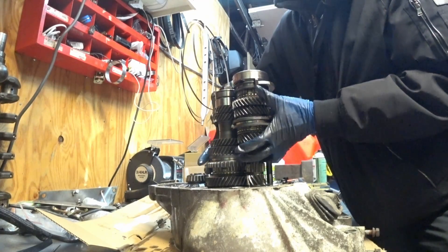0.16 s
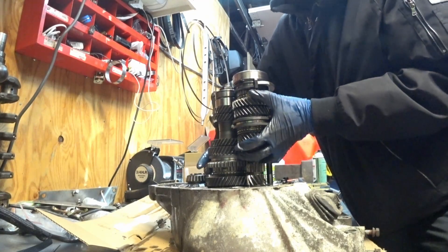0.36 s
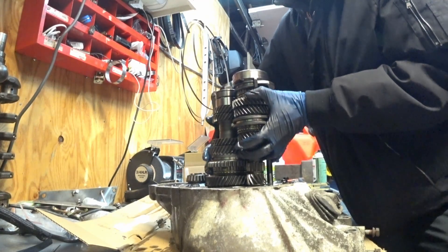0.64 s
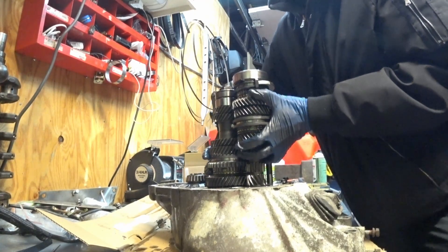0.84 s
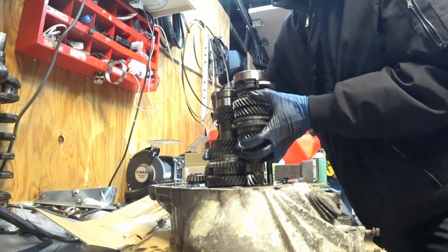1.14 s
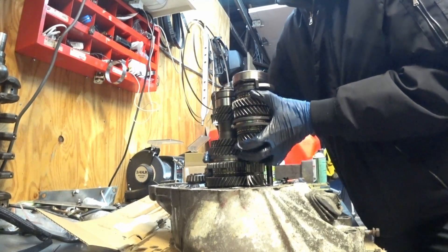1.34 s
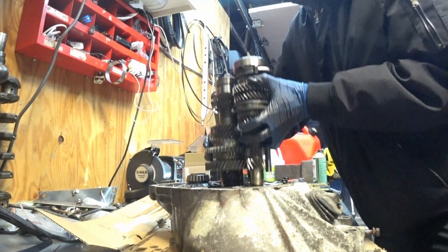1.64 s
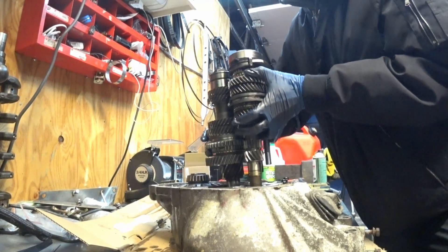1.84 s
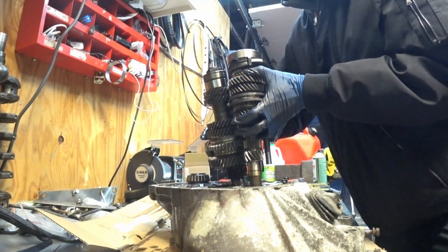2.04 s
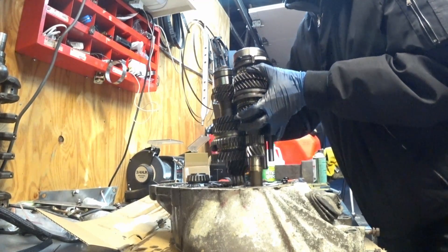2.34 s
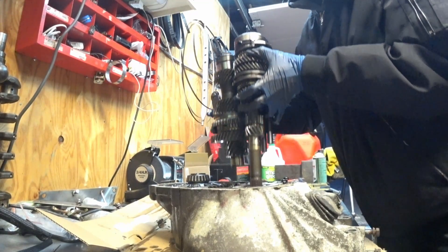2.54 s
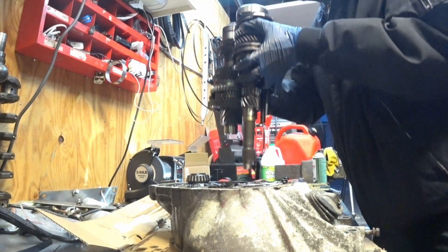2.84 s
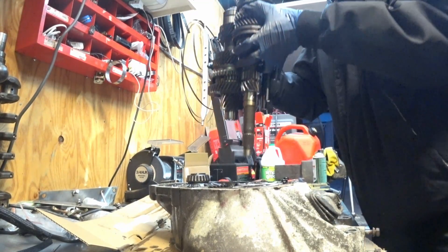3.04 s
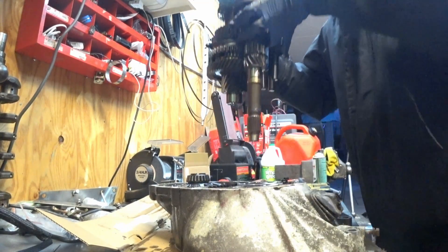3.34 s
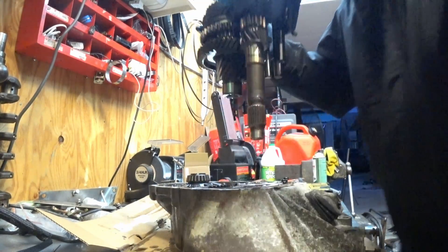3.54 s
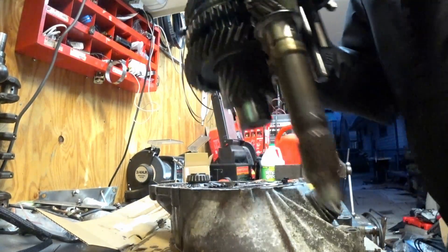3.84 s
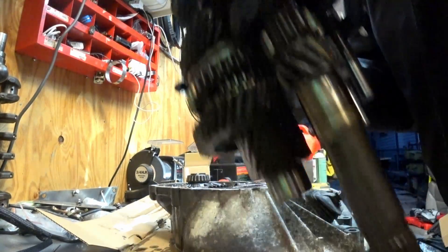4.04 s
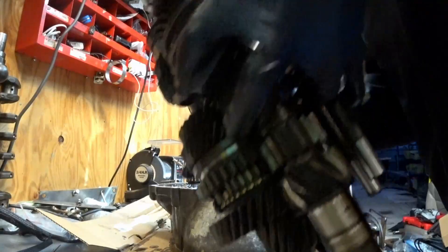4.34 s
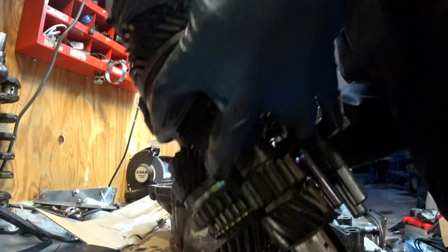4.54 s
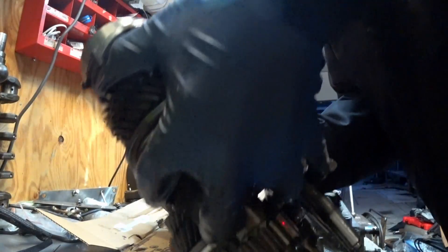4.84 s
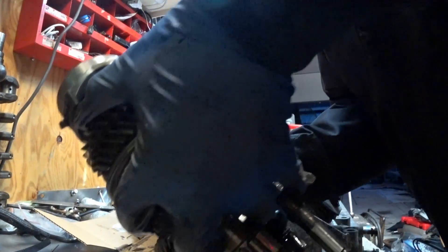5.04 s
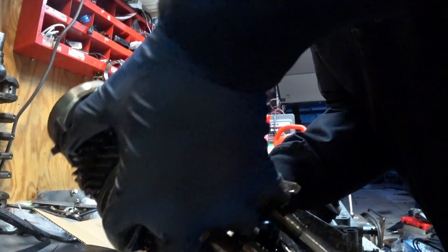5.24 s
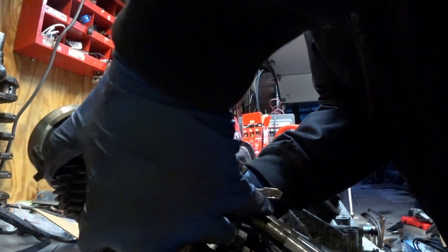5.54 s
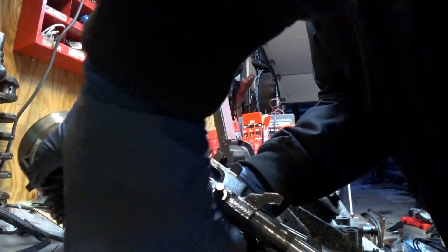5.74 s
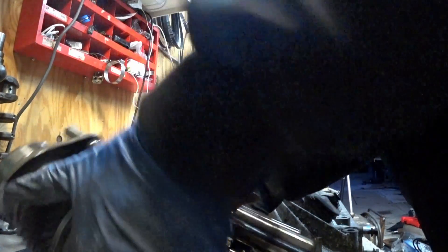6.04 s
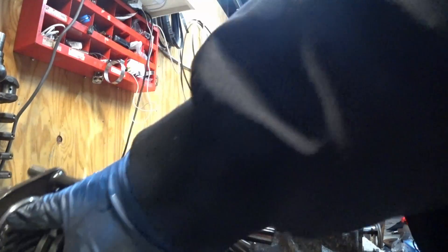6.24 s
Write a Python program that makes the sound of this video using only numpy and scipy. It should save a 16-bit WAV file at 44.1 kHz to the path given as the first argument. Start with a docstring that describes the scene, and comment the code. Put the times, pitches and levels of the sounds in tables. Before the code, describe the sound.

A microphone resting on a garage bench picks up booming low rumble and loud, sometimes squashed metal impacts as gears are pulled from a case. After nearly three seconds the knocking stops, leaving soft cloth rustle and scrape. A click and short ringing grate follow, then a thump, rapid damped clacks and scattered ticks as the parts are laid down.

```python
"""Steel gear shafts are worked loose in a gearbox case: teeth clink (modal bursts), blows and pushes
shake the bench that carries the microphone (low resonances). Groans and brief ringing notes sound
(gliding tones) as they are lifted out; a nylon jacket swishes and metal scrapes throughout (shaped noise).
A loose shaft grates and sings at 4.5 s (noise through narrow modes); from 4.9 s the steel is laid on the
wooden bench. A limiter ducks the whole sound at the loudest shocks."""
import sys
import numpy as np
from scipy import signal
from scipy.io import wavfile
from scipy.ndimage import uniform_filter1d

SR = 44100
rng = np.random.default_rng(int(sys.argv[2]) if len(sys.argv) > 2 else 0)


def to_wav(s):
    """Save 16-bit WAV."""
    ch = np.atleast_2d(s).T  # columns
    pcm = np.round(np.clip(ch, -1, 1) * 32767)  # PCM
    wavfile.write(sys.argv[1], SR, pcm.astype(np.int16))


N = 281358

# All levels are relative within their source.
# Teeth and shafts striking: t/s, level/dB, ring centre f/Hz
CLINKS = [(0.088, 1, 2780), (0.133, 4, 4040), (0.132, 0, 9050), (0.15, 7.5, 3600), (0.15, -3, 7800),
          (0.579, -15.5, 2240), (0.619, -12, 4800), (0.669, -12.5, 980), (0.745, -14, 1000),
          (0.893, 11.5, 810), (1.054, -18.5, 2320), (1.413, -21, 4670), (1.47, -14.5, 3150),
          (1.475, -16, 2900), (1.488, 6.5, 4570), (1.495, -1, 2430), (1.546, -15, 1070), (1.599, -22, 3900),
          (1.679, -22, 3570), (1.698, -10.5, 900), (1.762, -11.5, 3280), (1.817, -9, 3120),
          (2.01, -12, 1300), (2.122, -12, 1020), (2.362, -14.5, 3220), (2.459, -17, 1250),
          (2.508, -15, 3400), (2.681, -1, 1320), (2.681, 0, 3420), (2.784, -14, 1400), (2.797, -5.5, 2370),
          (2.849, -19.5, 1320), (4.346, -18, 4240), (4.349, -3.5, 4180), (4.375, -27, 4800),
          (4.389, -22, 2900), (4.565, -13, 834), (4.961, -10.5, 1020), (5.008, -9, 1006),
          (5.051, -8.5, 1150), (5.077, -6.5, 1090), (5.125, -5, 1200), (5.136, 1, 1210), (5.176, 3.5, 1370),
          (5.182, 6, 1230), (5.239, -6.5, 3400), (5.319, -6, 3800), (5.332, 5.5, 1530), (5.42, -0.5, 3840),
          (5.425, -9, 3160), (5.401, -8.5, 4470), (5.438, -0.5, 4430), (5.444, -4, 2250),
          (5.483, -6.5, 4550), (5.5, -8, 5070), (5.756, -0.5, 3060), (5.976, 0, 3370), (6.047, -10, 2710),
          (6.066, 1, 2030), (6.087, -12, 4700), (6.096, -2, 1170), (6.108, -6, 1270), (6.162, -6, 1730),
          (6.306, -7, 3550)]
# Modes of the gear cluster: f/Hz
STEEL_MODES_HZ = [870, 1060, 1250, 1480, 1660, 2050, 2400, 2800, 3150, 3550, 3850, 4400, 4840, 5200, 5900,
                  7000, 7800, 8800]
# Heavy blows that reach the bench: t/s, level/dB, ring centre f/Hz
THUDS = [(0.09, -5.5, 243), (0.675, -16, 480), (0.711, -14, 238), (0.745, -9.5, 524), (0.752, 6.5, 55.7),
         (0.828, 5, 68), (0.892, 11.5, 407), (0.907, 1.5, 443), (1.555, -12, 404), (1.648, 0.5, 39.3),
         (1.8, 3.5, 67), (1.841, -10, 560), (2.011, -17, 595), (2.123, -16.5, 600), (2.132, -3.5, 95),
         (2.201, -3, 99), (2.319, -3.5, 55.7), (2.506, -7.5, 225), (2.679, -1.5, 123), (4.494, -14.5, 51.6),
         (4.568, -16, 80), (4.887, 2.5, 104), (4.97, 1, 41.8), (6.095, -14, 103)]
# Bench shaking under the work: t/s, rumble level/dB, case rattle level/dB
SHAKE = [(0.0, -19, -26), (0.224, -1.5, -21.5), (0.33, -12, -34), (0.564, -14.5, -33.5),
         (0.693, -1.5, -14.5), (0.785, -9, -28), (0.92, -6, -13.5), (1.162, -6.5, -27.5),
         (1.422, -13, -29.5), (1.566, -2.5, -25.5), (1.821, -9, -15.5), (1.99, -2, -28), (2.08, -12, -34),
         (2.145, -7, -30.5), (2.609, -10.5, -18.5), (2.709, -4, -10), (2.873, -10.5, -72),
         (3.033, -25.5, -32.5), (3.45, -24.5, -31), (4.0, -23, -37), (4.86, -21.5, -29.5), (4.9, -5, -55),
         (5.223, -15, -25.5), (5.88, -15, -40), (5.97, -19, -28), (6.116, -2.5, -19.5), (6.201, -13.5, -36),
         (6.376, -9.5, -28.5)]
# Board resonances: f/Hz, width/Hz, level/dB
BOARD_MODES = [(39.96, 23.6, 7.5), (62.4, 28.4, 1.5), (100.7, 27.5, -3.5)]
# Case resonances: f/Hz, width/Hz, level/dB
CASE_MODES = [(185, 60, -2), (245, 55, 0), (410, 90, -6), (500, 80, -5), (588, 70, -6)]
# Loose shaft grating along a tooth edge: t/s, level/dB
GRATE = [(4.485, -34), (4.495, -11), (4.517, -12), (4.531, -36.5), (4.568, -38), (4.739, -31), (4.88, -101)]
# Modes of the loose shaft: f/Hz, level/dB
SHAFT_MODES = [(501, -15), (872, 0), (1140, -10), (1490, -7), (2040, -14), (2250, -9), (2790, -20),
               (3290, -22), (3880, -24), (5000, -22), (5320, -27)]
# Groans and brief ringing notes: start t/s, end t/s, first f/Hz, last f/Hz, level/dB
GLIDING_TONES = [(0.096, 0.143, 599, 565, -17.5), (0.15, 0.26, 8000, 7900, -33),
                 (1.463, 1.503, 592, 570, -21.5), (1.706, 1.741, 1980, 2030, -31),
                 (1.652, 1.703, 1023, 1068, -17), (2.307, 2.359, 210, 293, -15),
                 (2.359, 2.387, 380, 413, -13), (2.39, 2.425, 548, 610, -18),
                 (2.369, 2.393, 2030, 2040, -22), (2.547, 2.636, 3470, 3340, -36),
                 (3.75, 3.888, 167, 210, -30), (4.087, 4.159, 134, 126, -20),
                 (6.039, 6.148, 105.6, 107.8, -9.5)]
# Separate scrapes and swishes: start t/s, hold/s, level/dB
STROKES = [(0.091, 0.12, -22), (0.437, 0.1, -34), (0.618, 0.022, -26), (0.746, 0.007, -30.5),
           (0.814, 0.007, -34), (1.479, 0.05, -23), (1.659, 0.02, -19), (1.77, 0.025, -24),
           (1.818, 0.02, -28), (2.368, 0.092, -29.5), (2.511, 0.13, -34), (2.738, 0.11, -35),
           (3.694, 0.025, -23.5), (3.771, 0.33, -16.5), (4.353, 0.02, -24.5), (5.179, 0.056, -28.5),
           (5.331, 0.018, -27.5), (5.398, 0.1, -30), (5.739, 0.089, -15), (5.925, 0.012, -21),
           (6.027, 0.068, -20)]
# Light contact that never quite stops: t/s, level/dB
RUB = [(0.0, -34), (0.33, -38.5), (0.7, -48), (0.85, -39.5), (0.92, -32), (1.117, -47.5), (1.42, -34),
       (1.59, -36), (2.265, -42.5), (2.9, -40), (3.422, -33), (3.55, -37.5), (4.5, -36), (4.869, -31),
       (4.919, -49), (4.99, -37), (5.65, -41), (5.9, -27.5), (6.376, -31)]
# What is sliding: t/s, cloth share (1 cloth, 0 metal)
SLIDING = [(0, 0.63), (.6, 0.7), (.9, 0.13), (1.3, 0.69), (1.5, 0.59), (1.7, 0.47), (2.5, 0.15),
           (2.9, 0.49), (3.7, 0.79), (4.4, 0.66), (4.85, 0.28), (4.97, 0.19), (5.28, 0.22), (5.4, 0.56),
           (5.9, 0.89), (6.15, 0.53)]
# Spectrum of cloth hiss: f/Hz, level/dB
CLOTH_SPECTRUM = [(180, -54), (300, -12.5), (640, -18.5), (737, -12), (2130, -7.5), (5730, -2.5),
                  (10800, -14.5)]
# Spectrum of metal scrape: f/Hz, level/dB
SCRAPE_SPECTRUM = [(180, -58), (300, 16), (456, 6), (2040, -4.5), (2590, -9), (10800, -26)]
# Channel difference relative to the middle: f/Hz, level/dB
SIDE_SPECTRUM = [(40, -28), (1500, -26), (10000, -20)]

LAID_DOWN_S = 4.9
HELD_T60_S, RESTING_T60_S = 0.045, 0.015  # gloved hands damp the steel, the wooden bench more so
TICK_AT_4KHZ_DB, TICK_T60_S, REBOUND_DB = -15, 0.0044, -4
SHAFT_WIDTH_HZ = 25
MIN_RISE_DB_PER_S, MIN_FALL_DB_PER_S = 335, 215
BASS_CUT_HZ, EDGE_HZ = 28, 10900
LIMIT_DB, RECOVERY_DB_PER_S = -6.0, 490.0


def gain_of(db):
    """Amplitude gain of a level in dB."""
    return 10 ** (np.asarray(db) / 20)


def evened(x):
    """Scale to rms 1."""
    return x / np.sqrt(np.mean(x ** 2) + 1e-20)


def read(points, hz):
    """Read a spectrum table, linear in dB over log frequency."""
    f, value = np.transpose(points)
    return np.interp(np.log(hz + 1), np.log(f + 1), value)


def curves(rows, t):
    """Interpolate each column of a table over time."""
    s, *columns = np.transpose(rows)
    return [np.interp(t, s, c) for c in columns]


def add(mix, s, sound):
    """Mix in a sound from s seconds, cut at the end of the mix."""
    part = mix[round(s * SR):][:len(sound)]
    part += sound[:len(part)]


def resonate(x, hz, width_hz):
    """Two-pole resonance of gain 1 at its centre."""
    return signal.lfilter(*signal.iirpeak(hz, hz / width_hz, SR), x)


def resonate_twice(x, hz, width_hz, second_width_hz):
    """Two resonances in series, for steeper skirts."""
    return resonate(resonate(x, hz, width_hz), hz, second_width_hz)


def lumps(size):
    """Slow chance: noise smoothed over size samples, rms 1."""
    return evened(uniform_filter1d(uniform_filter1d(rng.standard_normal(N), size), size))


def clinks():
    """Each contact ticks, cracks, starts steel modes near its centre in step; its tick rebounds once."""
    out, t = np.zeros(N), np.arange(SR // 6) / SR
    hz = np.array(STEEL_MODES_HZ)[:, None]
    for s, db, centre_hz in CLINKS:
        luck, tune = rng.standard_normal((2, len(hz), 1))
        held = s < LAID_DOWN_S
        t60_s = HELD_T60_S if held else RESTING_T60_S

        focus = np.clip(30.0 - 1.2 * db, 12, 60)  # dB/octave^2; a light tap wakes fewer modes
        mode_db = -focus * np.log2(hz / centre_hz) ** 2 + 3 * luck
        tones = np.sin(2 * np.pi * hz * (1 + 0.018 * tune) * t)
        ring = (gain_of(mode_db - 60 * t / t60_s) * tones).sum(0)

        noise = rng.standard_normal(len(t))
        width_hz = 25 / focus * centre_hz
        crack = evened(resonate_twice(noise, centre_hz, width_hz, width_hz))
        crack *= 0.3 * gain_of(-60 * t / t60_s) + 0.05 * gain_of(-60 * t / 0.1)  # second term: room tail

        # light, hand-held contacts last longer; so do those of low centre
        contact_s = ((focus / 24) ** 2 if held else 1.3) / centre_hz
        rise = np.sin(np.pi / 2 * np.minimum(t / contact_s, 1)) ** 2
        ring = ring / abs(ring * rise).max()
        add(out, s, gain_of(db) * (0.7 * ring + 0.8 * crack) * rise)

        tick_db = db + TICK_AT_4KHZ_DB + 5.4 * np.log2(centre_hz / 4000)
        tick = np.diff(noise[::-1], prepend=0) * gain_of(tick_db - 60 * t / TICK_T60_S)
        add(out, s, tick)
        add(out, s + rng.uniform(0.003, 0.007), gain_of(REBOUND_DB) * tick)
    return out


def thuds():
    """A blow starts the decaying board and case modes nearest its centre."""
    out, t = np.zeros(N), np.arange(SR // 4) / SR
    modes = BOARD_MODES + CASE_MODES
    for s, db, centre_hz in THUDS:
        ring = np.zeros(len(t))
        for hz, width_hz, _ in modes:
            tone = np.sin(2 * np.pi * hz * rng.uniform(1.0, 1.05) * t)
            ring += gain_of(-6.5 * np.log2(hz / centre_hz) ** 2) * np.exp(-1.9 * width_hz * t) * tone
        onset = np.minimum(3 * centre_hz * t, 1)
        add(out, s, gain_of(db + 7.5) * ring / abs(ring).max() * onset)
    return out


def bench():
    """Uneven pushes drive the board resonances; lumpy grinding drives those of the case."""
    rumble_db, rattle_db = curves(SHAKE, np.arange(N) / SR)
    push, grind = rng.standard_normal((2, N))
    grind = grind * gain_of(4 * lumps(size=300))
    board = sum(gain_of(db) * evened(resonate_twice(push, hz, w, 2 * w)) for hz, w, db in BOARD_MODES)
    case = sum(gain_of(db) * evened(resonate_twice(grind, hz, w, 1.6 * w)) for hz, w, db in CASE_MODES)
    return gain_of(rumble_db - 6.5) * evened(board) + gain_of(rattle_db - 7.0) * evened(case)


def shaft():
    """Grating noise excites the narrow modes of the loose shaft."""
    t = np.arange(GRATE[0][0], GRATE[-1][0], 1 / SR)
    grit = rng.standard_normal(len(t))
    rings = signal.hilbert([resonate(grit, hz, SHAFT_WIDTH_HZ) for hz, _ in SHAFT_MODES])
    rings = (rings / abs(rings) ** 0.7).real  # steady pressure keeps each mode ringing evenly
    song = sum(gain_of(db) * evened(ring) for ring, (_, db) in zip(rings, SHAFT_MODES))
    flutter_db = 3 * lumps(size=350)[:len(t)]  # the edge catches and lets go
    song = song * gain_of(curves(GRATE, t)[0] + flutter_db)
    out = np.zeros(N)
    add(out, t[0], song * signal.windows.tukey(len(t), 0.1))
    return out


def gliding_tones():
    """A gliding tone of wavering pitch and level: low groans, short sung notes, faint high rings."""
    out = np.zeros(N)
    for start_s, end_s, first_hz, last_hz, db in GLIDING_TONES:
        n = round((end_s - start_s) * SR)
        waver = evened(uniform_filter1d(rng.standard_normal(n), size=200))
        turns = np.cumsum(np.geomspace(first_hz, last_hz, n) + 16.6 * waver) / SR
        level_db = db + 4 * np.clip(waver[::-1], -2, 1.5)
        tone = gain_of(level_db) * np.sin(2 * np.pi * turns)
        add(out, start_s, tone * signal.windows.tukey(n, 0.5))
    return out


def rubbing_db(t):
    """Each stroke swells, holds and dies away on top of the light contact."""
    start_s, hold_s, db = np.transpose(STROKES)[:, :, None]
    before_s, after_s = np.maximum(start_s - t, 0), np.maximum(t - start_s - hold_s, 0)
    quick = np.clip(0.03 / hold_s, 1, 3)  # short strokes start and stop more abruptly
    stroke_db = db - quick * (MIN_RISE_DB_PER_S * before_s + MIN_FALL_DB_PER_S * after_s)
    return 10 * np.log10(gain_of(2 * curves(RUB, t)[0]) + gain_of(2 * stroke_db).sum(0))


def rub():
    """Sliding hiss: cloth smooth and bright; metal grainy, darker, waking the steel modes."""
    frames, hz = N // 64 + 5, np.fft.rfftfreq(256, 1 / SR)
    t = np.arange(frames) * 64 / SR
    cloth = curves(SLIDING, t)[0]
    metal_share = 1 - cloth
    treble = hz > 900

    real, imag, patches = rng.standard_normal((frames, 129, 3)).T
    patches = uniform_filter1d(patches, size=4, axis=0)  # over frequency
    patches = evened(uniform_filter1d(patches, size=24, axis=1))  # over time
    grit = evened(uniform_filter1d(rng.standard_normal(frames), size=3))
    grain_db = 2.0 * patches + (0.62 + metal_share) * grit

    colour_db = np.outer(read(CLOTH_SPECTRUM, hz), cloth) + np.outer(read(SCRAPE_SPECTRUM, hz), metal_share)
    colour = gain_of(colour_db)
    colour /= np.sqrt((colour[treble] ** 2).sum(0))
    z = (real + 1j * imag) * colour * gain_of(grain_db)
    z = z / np.sqrt((abs(z[treble]) ** 2).sum(0).mean()) * gain_of(rubbing_db(t) + 0.5)
    hiss = signal.istft(z, nperseg=256, noverlap=192)[1][:N]

    metal = np.interp(np.arange(N) / SR, t, metal_share) * hiss
    # burrs catch about 60 times a second and jolt the steel
    catches = rng.random(N) < 60 / SR
    metal *= 1 + 2.9 * uniform_filter1d(35.0 * catches, size=40)
    # the contact wanders, so each mode comes and goes
    rings = sum(gain_of(3 + 4 * lumps(size=1200)) * resonate(metal, f, 120) for f in STEEL_MODES_HZ)
    return hiss + rings


def scene():
    """Sum the sources; a faint phase-scrambled copy sets the channels slightly apart."""
    mid = clinks() + thuds() + bench() + shaft() + gliding_tones() + rub()
    hz, _, z = signal.stft(mid, SR, nperseg=512)
    scramble = np.exp(2j * np.pi * rng.random(z.shape[::-1]).T)
    z = z * gain_of(read(SIDE_SPECTRUM, hz))[:, None] * scramble
    side = signal.istft(z, SR, nperseg=512)[1][:N]
    return np.array([mid + side, mid - side])


def record(dry):
    """Bass cut, limiter on the 3.4 ms level with quick recovery, clipping of sharp peaks, treble cut."""
    dry = signal.lfilter(*signal.butter(2, BASS_CUT_HZ, "high", fs=SR), dry)
    power = signal.lfilter(np.ones(150) / 150, 1, (dry ** 2).mean(0))
    level_db = 10 * np.log10(power + 1e-12)
    fall_db = np.arange(N) * RECOVERY_DB_PER_S / SR
    held_db = np.maximum.accumulate(level_db + fall_db) - fall_db
    over_db = np.maximum(held_db - LIMIT_DB, 0)
    limited = np.clip(dry / gain_of(over_db), -1, 1)
    treble_cut = signal.firwin(511, EDGE_HZ, window=("kaiser", 9), fs=SR)
    return signal.oaconvolve(limited, treble_cut[None], "same")


dry = scene()
out = record(dry)
to_wav(out)
```